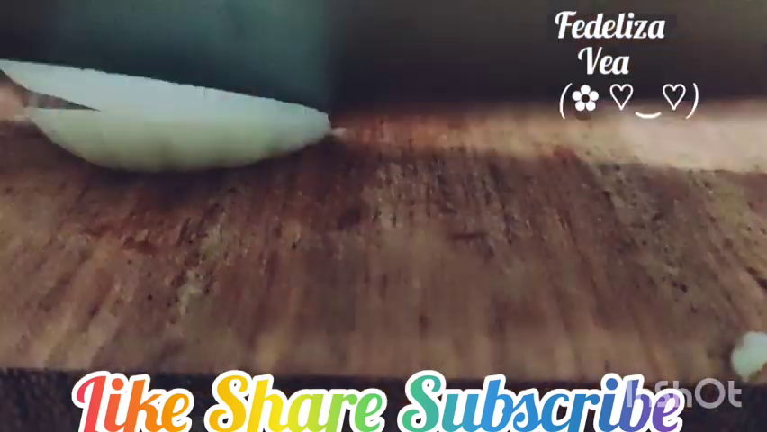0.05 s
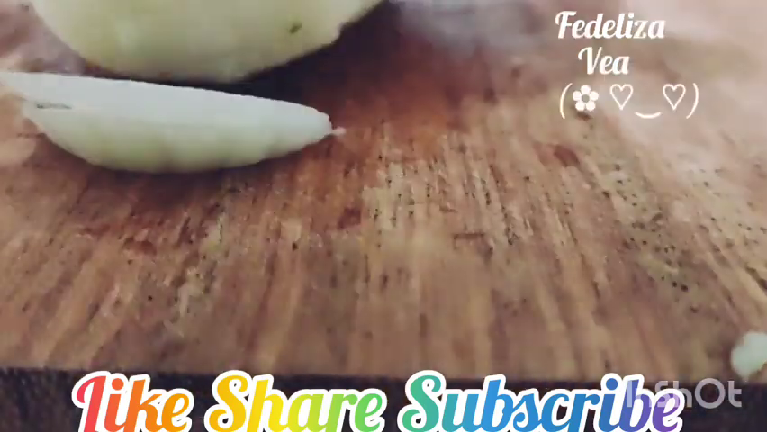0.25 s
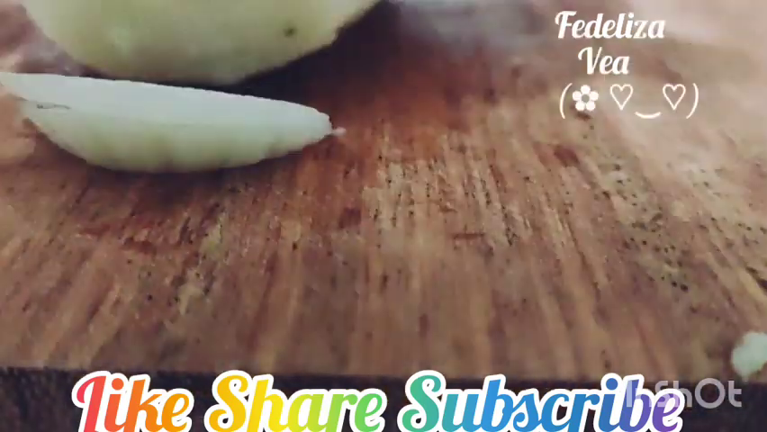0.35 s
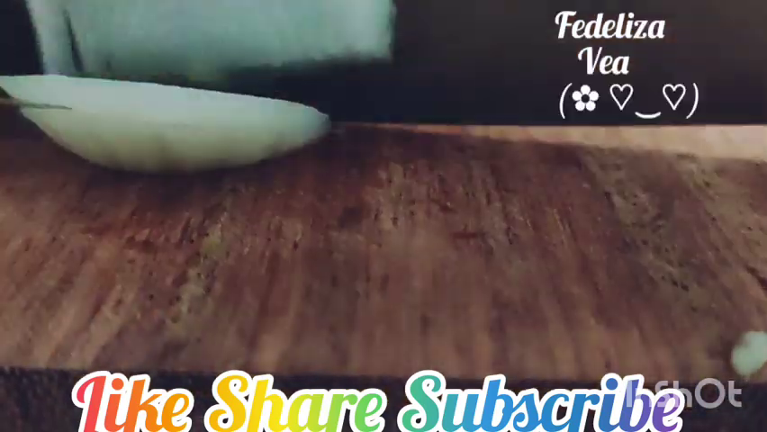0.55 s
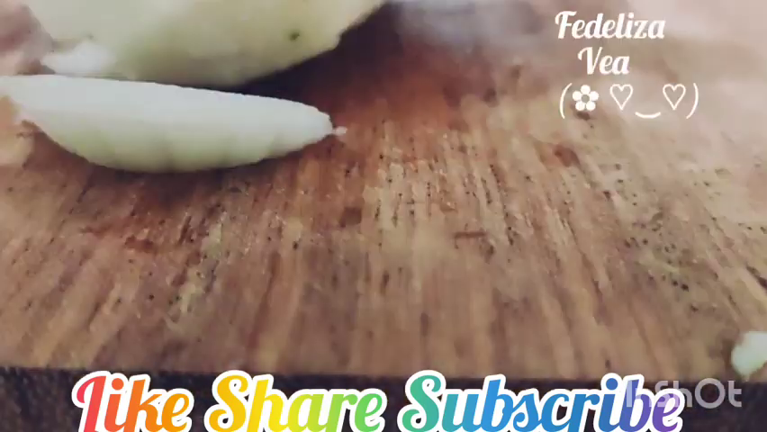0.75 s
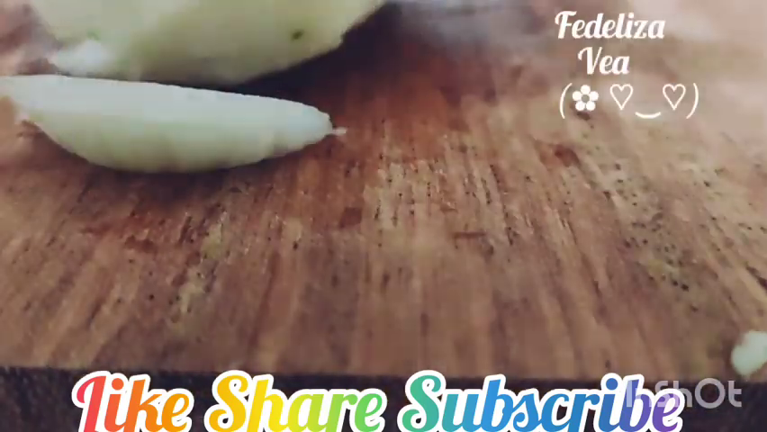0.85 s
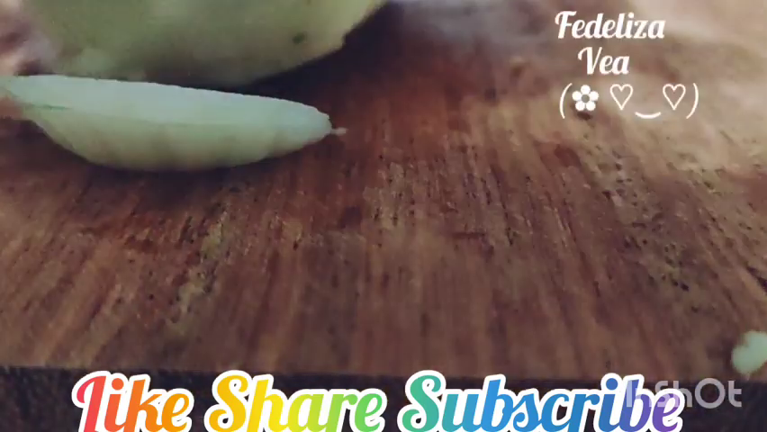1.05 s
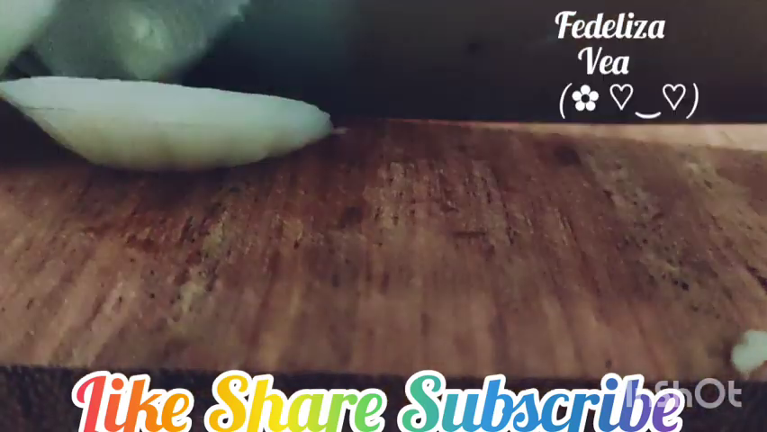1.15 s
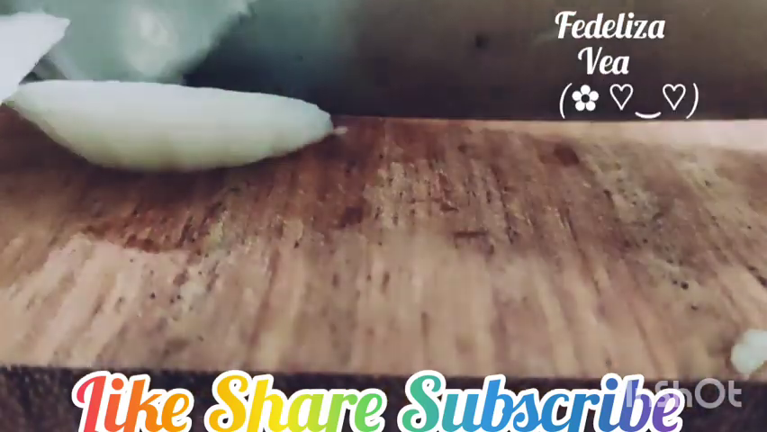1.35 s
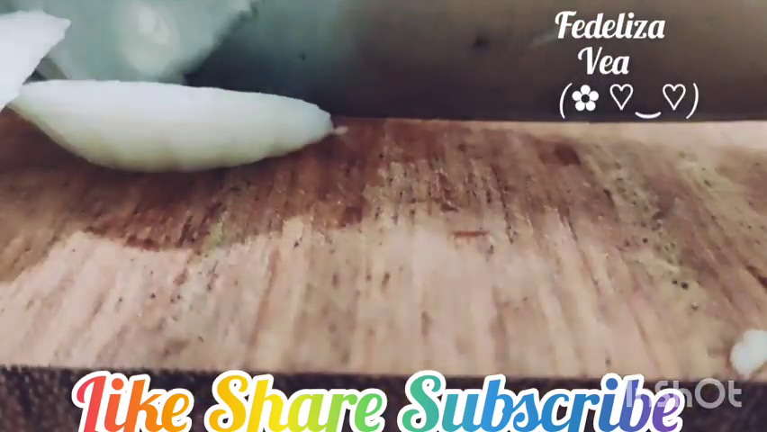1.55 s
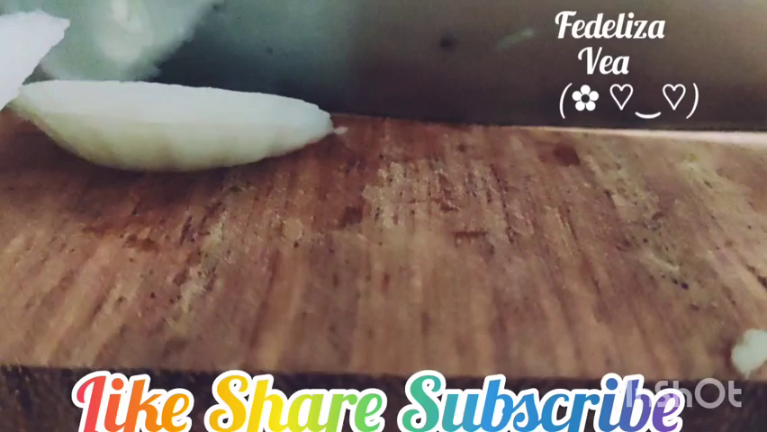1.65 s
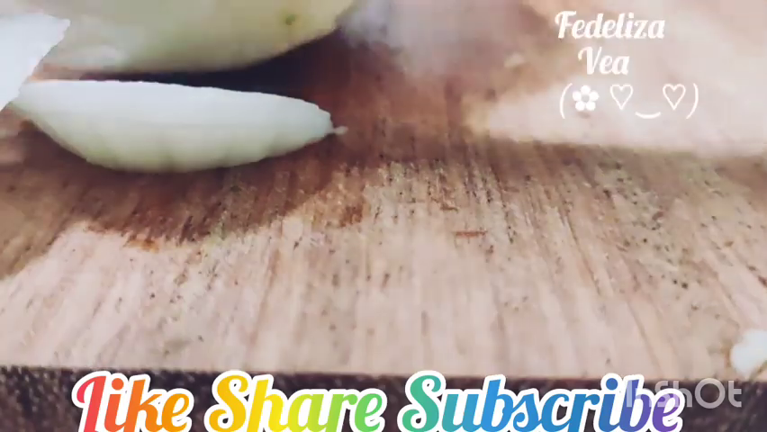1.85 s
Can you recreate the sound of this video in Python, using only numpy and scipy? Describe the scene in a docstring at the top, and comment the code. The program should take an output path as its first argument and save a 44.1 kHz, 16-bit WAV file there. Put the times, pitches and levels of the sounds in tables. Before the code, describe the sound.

Close up in a quiet kitchen, a knife crunches through an onion and knocks on a wooden cutting board. A second crackling slice and knock follow, with a short room echo, then near quiet with faint handling.

```python
"""Slicing a crisp vegetable

A kitchen knife cuts two slices on a wooden board, close to the microphone. Each stroke is a crunch
of thousands of bursting cells and a few snapping fibres. It ends in a knock on the board, and the
kitchen rings after it. An earlier knock is still dying away at the start, and between strokes
the blade and fingers brush the vegetable faintly."""
import sys
import numpy as np
from scipy import signal
from scipy.fft import rfft, irfft
from scipy.io import wavfile

SR = 44100
rng = np.random.default_rng(int(sys.argv[2]) if len(sys.argv) > 2 else 0)


def master(y):
    """Save y as 16-bit WAV."""
    cut = np.clip(np.atleast_2d(y).T, -1, 1)
    pcm = np.round(cut * 32767)  # scale
    wavfile.write(sys.argv[1], SR, pcm.astype(np.int16))


N = 83790

# the bright tone of crunches and scratches: (frequency [Hz], gain [dB])
CRUNCH_TONE = [(1200, -22.5), (2300, -7), (3600, 1), (11000, 3.4), (16000, 4)]


def amp(db):
    """Turns decibels into a number to multiply by."""
    return 10 ** (np.asarray(db) / 20)


def unit(x):
    """Scales a sound to an average (rms) strength of 1."""
    return x / np.sqrt(np.mean(x ** 2) + 1e-20)


def read(points, hz):
    """Reads between the rows of a table, on a scale where all octaves are equally wide."""
    row_hz, value = np.transpose(points)
    return np.interp(np.log(hz + 1), np.log(row_hz + 1), value)


def add(mix, start_s, sound):
    """Mixes a sound in, dropping whatever falls outside the mix."""
    at = round(start_s * SR)
    sound = sound[..., max(-at, 0):]
    part = mix[..., max(at, 0):][..., :sound.shape[-1]]
    part += sound[..., :part.shape[-1]]


def colour(x, tone, size=4096):
    """Gives a sound the tone in a table, with a filter that never rings ahead of a click."""
    log_gain = np.log(amp(read(tone, abs(np.fft.fftfreq(size, 1 / SR)))))
    response = np.exp(np.conj(signal.hilbert(log_gain)))
    taps = np.fft.ifft(response).real[:size // 2]
    taps = taps.reshape((1,) * (x.ndim - 1) + (-1,))
    return signal.fftconvolve(x, taps, axes=-1)[..., :x.shape[-1]]


def room_noise(n):
    """Stereo noise whose two sides are alike in the bass and hardly related in the treble."""
    # how alike left and right are: (frequency [Hz], likeness [0 to 1])
    likeness = [(30, 0.47), (280, 0.97), (600, 0.72), (1100, 0.15), (2500, 0), (16000, 0.23)]
    left, other = rfft(rng.standard_normal((2, n)))
    alike = np.clip(read(likeness, np.fft.rfftfreq(n, 1 / SR)), -1, 1)
    right = alike * left + np.sqrt(1 - alike ** 2) * other
    return irfft(np.array([left, right]), n)


def quiet_kitchen():
    """A faint, steady, low noise fills the room."""
    # tone of the background: (frequency [Hz], gain [dB])
    tone = [(25, -18), (60, -3.5), (130, 9), (170, -2.5), (215, 11), (290, 2), (500, -4), (900, -8),
            (1400, -16.5), (3000, -21.5), (16000, -22)]
    return amp(-61.5) * unit(colour(room_noise(N), tone))


def cell_clicks(per_s=5500, spread_db=2, clump_s=0.006):
    """Bursting cells click in clumps; each click reaches left and right with its own strength."""
    sizes = amp(spread_db * np.minimum(rng.exponential(1, N), 4))
    bursts = rng.random(N) < per_s / SR
    clump_db = unit(signal.lfilter([1], [1, -np.exp(-1 / (clump_s * SR))], rng.standard_normal(N)))
    sides = rng.choice([-1, 1], N) + 1.3 * rng.standard_normal((2, N))
    return unit(sizes * bursts * amp(clump_db) * sides)


def brushing():
    """Blade and fingers brush lightly over the moist vegetable."""
    # soft swells of sound: (time [s], width [s], level [dB])
    touches = [(0.082, 0.019, -49.5), (0.136, 0.02, -59), (0.608, 0.028, -55.5), (0.659, 0.0083, -53),
               (0.694, 0.009, -58.5), (0.749, 0.021, -56.5), (1.257, 0.037, -57.5), (1.472, 0.0069, -62),
               (1.568, 0.025, -57.5), (1.849, 0.0074, -63)]
    # tone of the rubbing: (frequency [Hz], gain [dB])
    tone = [(100, 3), (250, 5.5), (600, -4.5), (1000, 0), (1500, -10), (3000, -9.5), (6000, -7),
            (9000, -6.5), (16000, -13.5)]
    t = np.arange(N) / SR
    loudness = sum(amp(db) * np.exp(-.5 * ((t - s) / width) ** 2) for s, width, db in touches)
    return loudness * unit(colour(cell_clicks() + room_noise(N), tone))


def blade_lifts():
    """Drawing the blade off the board makes a low, falling blip."""
    # one blip a row: (time [s], width [s], level [dB], starting pitch [Hz], rate of fall [1/s])
    blips = [(0.056, .014, -39.5, 170.6, 19), (0.603, 0.015, -37, 160, 10)]
    out = np.zeros((2, N))
    for s, width, db, hz, fall in blips:
        t = np.arange(-3 * width, 3 * width, 1 / SR)
        cycles = np.cumsum(hz * np.exp(-fall * t)) / SR
        add(out, s + t[0], amp(db) * np.exp(-(t / width) ** 2) * np.sin(2 * np.pi * cycles))
    return out


def blade_ticks(fade_s=0.064):
    """The blade touches something lightly and rings for an instant."""
    # light taps: (time [s], level [dB], pitch [Hz])
    ticks = [(0.725, -52.5, 5850), (1.671, -57, 4730)]
    t = np.arange(SR // 8) / SR
    out = np.zeros((2, N))
    for s, db, hz in ticks:
        scratch = colour(rng.standard_normal((2, len(t))), CRUNCH_TONE)
        ring = .5 * np.sin(2 * np.pi * hz * t)
        add(out, s, amp(db - 60 * t / fade_s) * (scratch + ring))
    return out


def kitchen_ring(echo_s, echo_db, hold_s):
    """A knock bounces round the room and fades; bass and treble dip, then swell in a late echo."""
    # tone of the reflections: (frequency [Hz], gain [dB])
    room_tone = [(50, -36), (190, -24.5), (300, -20), (430, -33), (530, -19), (640, -19), (770, -24.5),
                 (1030, -2), (1250, -7), (1420, -17), (1800, -11), (2400, -25), (3200, -28), (4500, -28.5),
                 (6200, -35.5), (8000, -47)]
    # lingering notes of board and room: (pitch [Hz], level [dB])
    notes = [(286, -53), (622, -54), (652, -47), (992, -36.5), (1045, -45), (1138, -30), (1212, -35.5),
             (1270, -44), (1524, -48.5), (1583, -39.5), (1802, -52), (1856, -58), (2236, -56.5)]
    t = np.arange(SR * 3 // 4) / SR
    lead_s = np.array([[0], [0.00045]])  # the right side is slightly ahead
    tones = sum(amp(db) * np.sin(2 * np.pi * (hz * (t + lead_s) + rng.random())) for hz, db in notes)
    reflections = amp(-12) * colour(room_noise(len(t)), room_tone)
    spectrum = rfft(reflections + tones)
    band = np.digitize(np.fft.rfftfreq(len(t), 1 / SR), [480, 800])
    bass, middle, treble = (irfft(spectrum * (band == k), len(t)) for k in range(3))
    fall_db = 110 * np.minimum(t, hold_s) + 255 * np.maximum(t - hold_s, 0)  # slow, then fast
    dip_db = 3.5 * np.exp(-((t / echo_s - 0.69) / 0.34) ** 2)
    swell_db = echo_db * np.exp(-((t / echo_s - 1) / .24) ** 2) - dip_db
    bass *= amp(swell_db - 0.62 * fall_db)  # the bass lasts longest
    middle *= amp(-fall_db)
    treble *= amp(swell_db - fall_db)
    fade_in = np.minimum(t / 0.0089, 1)
    return fade_in * (bass + middle + treble)


def knock(rebound_s=0.002278, free_swing_s=0.0018, left_lag_s=0.00023):
    """A sharp push and a quick rebound; the board swings until the pressing blade stills it."""
    # tone of the push: (frequency [Hz], gain [dB])
    push_tone = [(40, -24), (250, -9), (600, -4.5), (1100, -3.5), (2200, 14.5), (3100, -3.5), (4100, 2.5),
                 (5200, -0.5), (7000, -30), (11000, -11), (16000, -29)]
    # natural notes of board and blade: (pitch [Hz], level [dB], time to fade by 60 dB [s])
    notes = [(590, -35, 0.011), (1113, -18, 0.0076), (1183, -20.5, 0.0087), (1766, -21, 0.0063),
             (2100, -42.5, 0.0088), (3810, -37, .008), (6000, -39, .013)]
    t = np.arange(SR // 10) / SR
    push = colour(1. * (t == 0), push_tone)
    rebound = amp(-5.5) * np.interp(t - rebound_s, t, push, left=0)
    pressed_s = np.maximum(t - free_swing_s, 0)
    swing = sum(amp(db - 60 * pressed_s / fade_s) * np.sin(2 * np.pi * hz * t)
                for hz, db, fade_s in notes)
    right = -(push + rebound + swing)
    delayed = np.interp(t - left_lag_s, t, right, left=0)
    left = amp(2) * colour(delayed, [(500, -7.5), (1200, -0.5)])  # later and with less bass
    return np.array([left, right])


def board_knocks():
    """The blade lands on the board at the end of each stroke, and the kitchen answers."""
    # landings: (time [s], level [dB], room level [dB], echo delay [s], echo boost [dB], slow fade [s])
    landings = [(-.142, 6, 11.5, 0.075, 2, 0.17), (0.4088, 3.5, 9, 0.1, 4, 0.14),
                (1.0608, 0.5, 9, 0.071, 5.5, 0.12)]
    out = np.zeros((2, N))
    for s, db, room_db, echo_s, echo_db, hold_s in landings:
        add(out, s, amp(db) * knock())
        add(out, s, amp(room_db) * kitchen_ring(echo_s, echo_db, hold_s))
    return out


def steel_ring(t, fade_s=0.022):
    """The steel blade rings briefly after a click."""
    # natural notes of the blade: (pitch [Hz], level [dB])
    notes = [(2627, -34.5), (4802, -10.5), (8005, -12.5)]
    return sum(amp(db - 60 * t / fade_s) * np.sin(2 * np.pi * hz * t) for hz, db in notes)


def fibre_snaps(rise_s=0.00037):
    """A tough fibre breaks with a crack that makes the blade ring and thud."""
    # breaking fibres: (time [s], level [dB], pitch [Hz], thud level [dB])
    snaps = [(0.211, -43.5, 2940, -20), (0.2258, -41.5, 6040, -24), (0.2676, -31, 5900, -11.5),
             (0.2739, -26, 5770, -21), (0.2891, -26, 5560, -23.5), (0.3532, -27.5, 4750, -23),
             (0.3697, -27.5, 6040, -21), (0.7697, -24, 3400, -8), (0.792, -34, 4060, -14.5),
             (0.8798, -34.5, 5900, -21), (0.8972, -28.5, 5770, -21), (0.939, -25, 6150, -24),
             (0.9689, -17, 6200, -16), (1.046, -26.5, 6040, -35), (1.0497, -21, 6250, -32.5)]
    # tones of the crack and of the thud: (frequency [Hz], gain [dB])
    crack_tone = [(600, -13), (2200, 0.5), (3600, -2), (6000, -0.5), (8000, 4), (15000, 3.5)]
    thud_tone = [(100, -14.5), (600, -3.5), (1200, 14.5), (1800, -2), (2800, -2.5), (6000, -14)]
    t = np.arange(SR // 50) / SR
    pulse = t / rise_s * np.exp(1 - t / rise_s)
    thud = colour(1. * (t == 0), thud_tone)
    out = np.zeros((2, N))
    for s, db, hz, thud_db in snaps:
        burst = pulse * (.55 * np.sin(2 * np.pi * hz * t) + rng.standard_normal((2, len(t))))
        crack = colour(burst, crack_tone) + steel_ring(t)
        add(out, s, amp(db) * crack + amp(thud_db) * thud)
    return out


def crunching():
    """Cells burst along the edge and shake the blade; the board rumbles as the blade drags."""
    # one list of points a stroke: (time [s], relative crunch level [dB], relative body level [dB])
    strokes = [
        [(.2095, -47.5, -49.5), (.229, -38.5, -43.5), (.269, -34.5, -47.5), (.297, -39.5, -50.5),
         (.35, -39.5, -54), (.408, -39, -57.5)],
        [(.756, -54, -64), (.768, -43.5, -51), (.771, -33.5, -42.5), (.82, -37.5, -47), (.94, -39.5, -56),
         (1.0, -39, -55.5), (1.043, -36, -51.5), (1.06, -52, -42)],
    ]
    # tones of the blade's body and of the board's rumble: (frequency [Hz], gain [dB])
    body_tone = [(40, -1.5), (100, -3.5), (220, -7.5), (480, -12), (850, -3), (1200, 4), (1400, -4.5),
                 (1700, 6), (2050, -8), (2800, -12.5), (5000, -34)]
    rumble_tone = [(60, -23), (190, -1), (310, -5), (600, -23.5), (1500, -30)]
    t = np.arange(N) / SR
    crackle = unit(colour(cell_clicks(), CRUNCH_TONE))
    body = unit(colour(cell_clicks(), body_tone))
    steel = unit(signal.fftconvolve(cell_clicks(), steel_ring(t[:SR // 20])[None], axes=1)[:, :N])
    rumble = unit(colour(room_noise(N), rumble_tone))
    crunch = crackle + amp(-17) * steel + amp(-20.5) * rumble
    out = np.zeros((2, N))
    for stroke in strokes:
        times, crunch_db, body_db = np.transpose(stroke)
        out += crunch * amp(4 + np.interp(t, times, crunch_db, left=-120, right=-120))
        out += body * amp(3 + np.interp(t, times, body_db, left=-120, right=-120))
    return out


def slicing(room_db=-5, fade_s=0.053):
    """The crunch and the snaps of the cut, with a short tail of room reflections."""
    cut = crunching() + fibre_snaps()
    t = np.arange(SR // 3) / SR
    tail = unit(room_noise(len(t)) * amp(-60 * t / fade_s)) / np.sqrt(len(t))
    return cut + amp(room_db) * signal.fftconvolve(cut, tail, axes=1)[:, :N]


def scene():
    """Knife work over the quiet of the kitchen."""
    return board_knocks() + slicing() + brushing() + blade_lifts() + blade_ticks() + quiet_kitchen()


def record(dry):
    """Each side of the microphone colours the sound in its own way; the highest treble is cut off."""
    # tones of the two microphone openings: (frequency [Hz], gain [dB])
    left_tone = [(50, -7.5), (300, -3.5), (700, 0.5), (1100, -1), (2500, 4), (4400, 2.5), (5500, 5.5),
                 (6100, 10), (6700, 7.5), (7300, 4), (8300, -10), (10000, -17), (11500, -26.5),
                 (14000, -18)]
    right_tone = [(50, -4.5), (300, -2.5), (700, 2.5), (1100, 0), (2500, 2), (4000, 1), (5000, -5),
                  (6000, -11), (7400, -12.5), (9200, -10.5), (11000, 0.5), (12500, -10.5), (16000, -23.5)]
    sides = np.array([colour(dry[0], left_tone), colour(dry[1], right_tone)])
    treble_cut = signal.firwin(511, 16200, window=("kaiser", 9), fs=SR)
    return signal.oaconvolve(sides, treble_cut[None], "same")


dry = scene()
out = record(dry)
master(out)
```